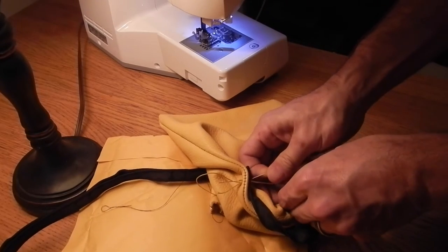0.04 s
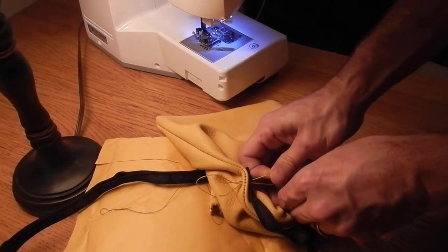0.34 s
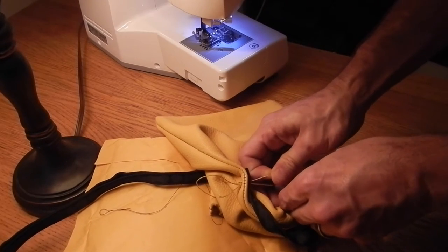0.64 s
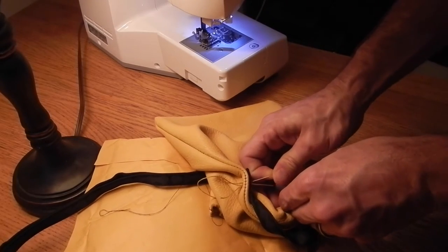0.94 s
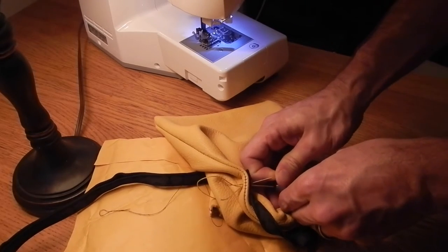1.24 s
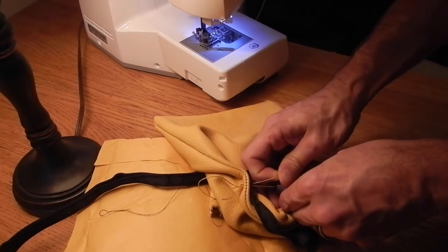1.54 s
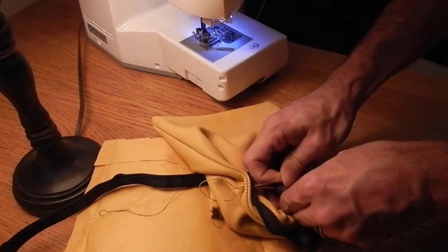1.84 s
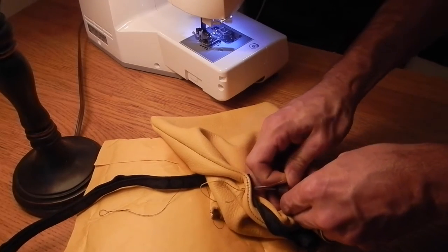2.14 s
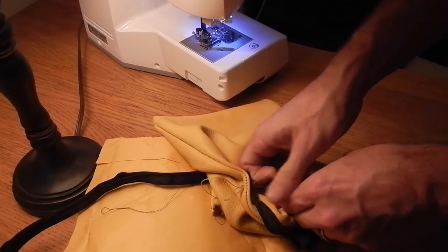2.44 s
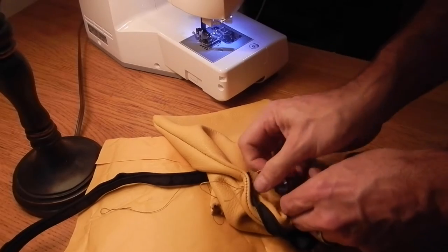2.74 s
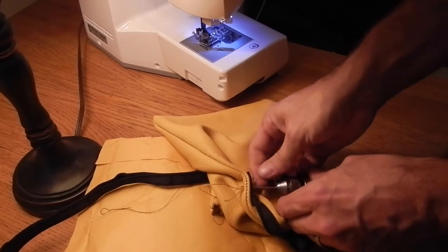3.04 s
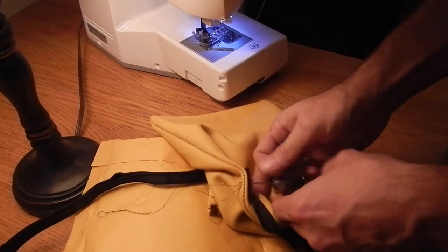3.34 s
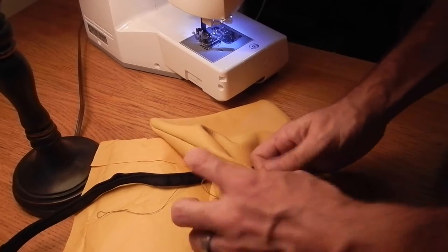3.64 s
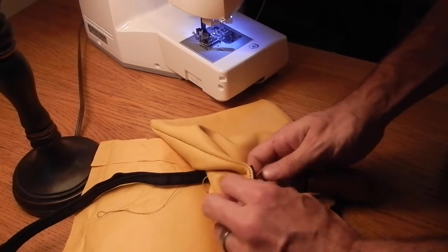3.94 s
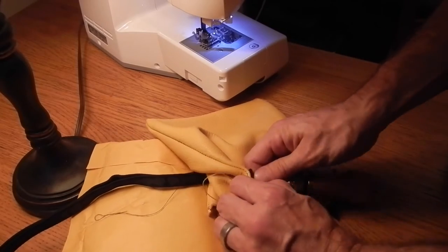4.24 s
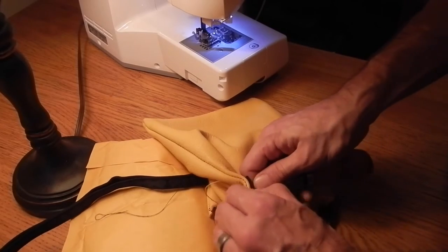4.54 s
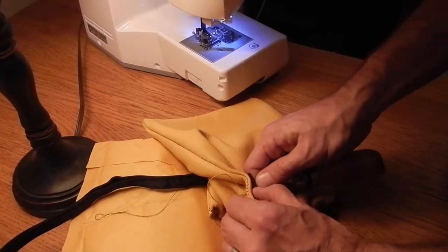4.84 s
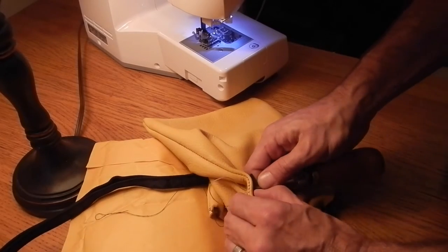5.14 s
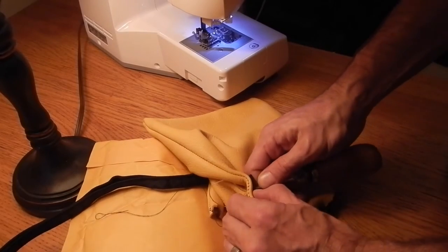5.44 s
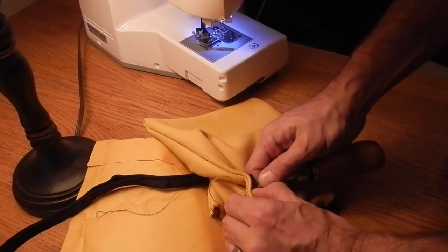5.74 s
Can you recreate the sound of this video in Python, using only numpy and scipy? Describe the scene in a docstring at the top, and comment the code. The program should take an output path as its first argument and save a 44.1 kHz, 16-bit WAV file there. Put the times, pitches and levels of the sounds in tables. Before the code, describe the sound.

Irregular sharp knocks of a tool on a wooden table, among faint needle clicks and the rubbing of leather being sewn by hand.

```python
"""The handle of an awl knocks on a wooden table as hands stitch soft leather in a small, quiet room.
Each blow rings the table top's modes under a hard click, then chatters in quick rebounds.
Needle and thread tick, hiss and squeak in the seam; the leather sticks and slips, rustling under the
fingers and once dragged with a short rasp. Thin steel rings faintly over a low room tone."""
import sys
import numpy as np
from scipy import signal
from scipy.fft import rfft, irfft, next_fast_len
from scipy.io import wavfile
from scipy.ndimage import map_coordinates

SR = 44100
rng = np.random.default_rng(int(sys.argv[2]) if len(sys.argv) > 2 else 0)


def materialize(psi):
    """Save the field psi as 16-bit PCM at rate SR to the path in sys.argv[1].

    A 1-D psi becomes a single channel; in a 2-D psi each row is a channel.
    """
    bounded = np.clip(np.atleast_2d(psi).T, -1, 1)
    quanta = np.round(bounded * 32767).astype(np.int16)
    wavfile.write(sys.argv[1], SR, quanta)


N = 256220

# how busily the fingers work the leather: t/s, effort/dB
FINGER_EFFORT = [(0.0, -71), (1.23, -65), (1.42, -71), (1.67, -69), (1.88, -59.5), (2.12, -68.5),
                 (2.31, -62), (2.48, -62), (2.88, -60), (3.54, -69.5), (3.82, -79), (4.29, -61.5),
                 (4.4, -58), (4.77, -68), (4.95, -55.5), (5.06, -58.5), (5.57, -61), (5.81, -63)]
# dull colour of rubbed leather: f/Hz, level/dB
LEATHER_COLOUR = [(120, -78), (200, -29), (311, -4.5), (770, 0), (1030, -4), (1400, -10), (1890, -12.5),
                  (2650, -19.5), (3000, -21), (3900, -21), (6600, -120)]


def awl_knocks(attack_s=0.00024, crack_db=-7, main_hz=820):
    """Each blow rings the table top; a harder one brings out the side modes. The tool adds a click."""
    # modes of the table top: f/Hz, level/dB, t60/s
    top_modes = [(241, -28, 0.084), (371.5, -6, 0.037), (553, -3, 0.045), (828.4, 12.5, 0.02),
                 (1060, 11, 0.0062), (1359, 2, 0.036), (1684, -13, 0.06), (2170, -21.5, 0.14)]
    # its many weak modes, heard as one short crack: f/Hz, level/dB
    crack_colour = [(25, -54), (60, -71), (130, -45.5), (230, -4.5), (350, -1), (560, 0.5), (780, -1),
                    (1050, 7), (1420, -9.5), (1600, -13.5), (2050, -19.5), (2600, -19.5), (4000, -26),
                    (7000, -91)]
    # colour of a hard contact: f/Hz, level/dB
    click_colour = [(100, -68), (600, -29), (1900, 14), (2600, -1), (4100, -4), (5000, -1), (6300, -3.5),
                    (7500, -7.5), (10000, -16), (14000, -23)]
    out, t = np.zeros(N), np.arange(SR // 2) / SR
    hz, level, t60 = np.transpose(top_modes)[:, :, None]
    for s, db, hardness, pitch, click_db, click_hz in handle_contacts():
        strength = amp(level + hardness * np.abs(np.log2(hz / main_hz)) + rng.normal(0, 0.24, hz.shape))
        detune = np.exp(rng.normal(0, .025, hz.shape))  # the hands' load shifts each mode
        modes = strength * amp(-60 * t / t60) * np.sin(2 * np.pi * hz * pitch * detune * t)
        wood = crest(low_cut(modes.sum(0) * (1 - np.exp(-t / attack_s)), corner_hz=238))
        crack = crest(low_cut(coloured(burst(t, t60=0.087), crack_colour), corner_hz=113))
        knock = with_echoes(wood + amp(crack_db) * crack, strength=0.55, dull_hz=3400)
        boom_envelope = amp(-35 - 60 * t / 0.26) * (1 - np.exp(-t / 0.0017))
        boom = boom_envelope * np.sin(2 * np.pi * 124 * t)  # the room's lowest resonance
        click = filtered(burst(t, t60=0.027), lambda f: 0.32 + resonance(f, click_hz, click_hz / 7))
        add(out, s, amp(db) * (in_room(knock, wet_db=-9) + boom))
        add(out, s, amp(click_db) * in_room(crest(coloured(click, click_colour)), wet_db=-12))
    return out


def handle_contacts(rebounds=2, flight_s=.017, flight_shrink=0.69, bounce_loss_db=5.5):
    """The handle strikes, then chatters in ever quicker and softer rebounds."""
    # blows on the wood: t/s, level/dB, hardness/(dB per octave from the main mode), pitch/ratio,
    # click level/dB, click f/Hz, drop to the first rebound/dB
    blows = [(1.7835, -31.5, -25, 0.9, -54, 5000, 30), (1.7995, -35, 7, 0.54, -48, 4400, 30),
             (1.865, -8, 1, 1.065, -13.5, 5100, 27), (1.8665, -15.5, 5, 0.605, -20, 5070, 38),
             (2.3025, -10.5, -5.5, 0.99, -23, 5800, 24), (2.599, -11, -9, 0.98, -37, 5850, 23),
             (4.294, -30, -5, .56, -36.5, 4530, 10), (4.359, -15, -7, 1.25, -27, 4340, 25),
             (4.6715, -11, -2.5, 0.98, -17, 5800, 30), (4.967, -5, -6, 1.03, -14.5, 4650, 33),
             (5.1412, -5, -6, 1.05, -16, 3030, 17), (5.178, -12, -4, 1.05, -29, 3100, 4.5),
             (5.573, -35, 7, 0.59, -62, 5000, 1)]
    for s, db, hardness, pitch, click_db, click_hz, drop_db in blows:
        yield s, db, hardness, pitch, click_db, click_hz
        for k in range(rebounds):
            s += flight_s * flight_shrink ** k
            loss_db = drop_db + bounce_loss_db * k
            yield s, db - loss_db, hardness, pitch, click_db - loss_db, click_hz


def needle_ticks(cycles=6, pop_noise_db=-5, pop_trim_db=-3):
    """Needle and thread catch and let go: a dry snap, and a pop of a few cycles in the taut leather."""
    # clear catches: t/s, pop level before trim/dB, pop f/Hz, snap level/dB, snap f/Hz
    catches = [(.928, -32.5, 816, -53, 3500), (1.6423, -31.5, 2050, -36, 4900),
               (2.3412, -19.5, 1040, -36, 5030), (2.524, -65, 900, -42, 5400),
               (2.5811, -58, 900, -36, 5230), (2.725, -34.5, 1150, -43, 3480),
               (2.7885, -30.5, 840, -41.5, 4600), (2.8673, -56, 900, -40, 5060),
               (2.885, -35, 1060, -49, 4000), (3.025, -34, 1010, -37.5, 3920),
               (3.0365, -29.5, 734, -40, 4170), (3.11, -47, 850, -42.5, 3980),
               (3.259, -43.5, 750, -47, 5100), (3.4027, -39, 846, -57, 4000), (3.6218, -56, 900, -51, 5030),
               (3.682, -43, 746, -66, 4000), (3.8255, -38.5, 690, -62, 5000),
               (4.0175, -22.5, 1010, -37.5, 3670), (4.148, -38, 950, -52, 4480),
               (4.180, -33, 1680, -49, 4220), (4.1946, -33.5, 1090, -56, 3500),
               (4.325, -20.5, 960, -39, 4400), (4.3564, -23.5, 560, -32, 4200),
               (4.468, -34.5, 1140, -34, 4470), (4.7087, -28, 900, -34, 4900), (4.879, -75, 940, -40, 6060),
               (5.35, -33, 1000, -47, 4000)]
    out, t = np.zeros(N), np.arange(SR // 4) / SR
    for s, db, pop_hz, snap_db, snap_hz in catches + faint_catches():
        tone = amp(-60 * t * pop_hz / cycles) * np.sin(2 * np.pi * pop_hz * t) * (1 - np.exp(-t * pop_hz))
        scuff = crest(coloured(burst(t, t60=0.062), LEATHER_COLOUR))
        pop = crest(low_cut(tone, corner_hz=330)) + amp(pop_noise_db) * scuff
        snap = filtered(burst(t, t60=0.02),
                        lambda hz: resonance(hz, snap_hz, 0.31 * snap_hz) / (1 + 1j * hz / 9500) ** 2)
        add(out, s, in_room(amp(db + pop_trim_db) * pop + amp(snap_db) * crest(snap), wet_db=-8.5))
    return out


def faint_catches(per_s=12, pop_hz=870, snap_hz=4900, spread_db=0.5):
    """The thread also snags lightly at random moments, louder while the fingers are busy."""
    s = rng.random(round(per_s * N / SR)) * N / SR
    pop_softness, pop_pitch, snap_softness, snap_pitch = rng.standard_normal((len(s), 4)).T
    effort_db = curve(FINGER_EFFORT, s)
    pop_db = effort_db + 15.5 - spread_db * pop_softness
    snap_db = effort_db + 12.5 - spread_db * snap_softness
    return list(zip(s, pop_db, pop_hz * np.exp(.15 * pop_pitch),
                    snap_db, snap_hz * np.exp(.17 * snap_pitch)))


def leather_slides(swell_share=0.25):
    """Sliding leather sticks and slips: a dull body and a dry rasp swell and fade together."""
    # strokes: t/s, length/s, body level/dB, rasp level/dB
    strokes = [(.68, .16, -52, -85), (0.795, 0.092, -52, -62.5), (1.21, 0.37, -67, -66),
               (1.69, 0.033, -59, -52.5), (2.682, 0.14, -47.5, -55), (2.835, 0.18, -61, -61),
               (2.981, .19, -47.5, -54.5), (3.988, 0.056, -41, -58), (4.289, 0.14, -37, -39),
               (4.369, 0.14, -58, -41), (5.518, 0.08, -63, -55), (5.546, .14, -52, -80)]
    # colour of the rasp: f/Hz, level/dB
    rasp_colour = [(100, -60), (1000, -4), (1800, 0.5), (2700, -10.5), (3600, -4.5), (5800, -7.5),
                   (6700, -6), (9500, -15.5), (12000, -19), (15000, -32)]
    t = np.arange(N) / SR
    body, rasp = np.zeros(N), np.zeros(N)
    for start, length, body_db, rasp_db in strokes:
        swell = np.interp((t - start) / length, [0, swell_share, 1], [0, 1, 0]) ** 1.45
        body += amp(body_db) * swell
        rasp += amp(rasp_db) * swell
    body *= coloured(grains(per_s=1200, spread_db=2.5), LEATHER_COLOUR)
    rasp *= coloured(grains(per_s=2000, spread_db=-3), rasp_colour)
    return in_room(body + rasp, wet_db=-12)


def leather_rustle(typical_effort_db=-63.5):
    """The fingers never rest: soft rubbing under sparse crinkles of the hide, both growing with effort."""
    # colour of the dry crinkle: f/Hz, level/dB
    crinkle_colour = [(100, -68), (1000, -7), (1900, 1), (2600, -4), (3600, -1), (5000, -4), (6600, 0.5),
                      (8000, -10.5), (10500, -16), (15000, -31)]
    effort_db = curve(FINGER_EFFORT, np.arange(N) / SR) - typical_effort_db
    creases = grains(per_s=500, spread_db=5)
    rub = amp(-61.5 + 0.2 * effort_db) * coloured(grains(per_s=800, spread_db=6), LEATHER_COLOUR)
    crinkle = amp(-69.5 + 1.4 * effort_db) * coloured(creases, crinkle_colour)
    return in_room(rub + crinkle, wet_db=0)


def thread_hiss():
    """Thread running through its hole gives a fine hiss that swells and fades with its speed."""
    # pulls of the thread: t/s, length/s, level/dB
    pulls = [(.25, .2, -73), (0.803, 0.47, -72), (5.618, .26, -61.5)]
    # colour of the hiss: f/Hz, level/dB
    hiss_colour = [(3000, -60), (7000, -9), (9270, -11), (10300, -2), (11700, -5), (13800, -12),
                   (15000, -22)]
    t = np.arange(N) / SR
    speed = sum(amp(db) * np.sin(np.pi * np.clip((t - s) / length, 0, 1)) for s, length, db in pulls)
    return speed * coloured(rng.standard_normal(N), hiss_colour)


def thread_squeaks(fade_s=.03, jitter_hz=110, flicker_db=2.5):
    """Tight thread sings a thin, unsteady tone that glides with the pull through one broad resonance."""
    # one pitch glide per squeak: t/s, f/Hz
    glides = [
        [(2.18, 8850), (2.23, 10100), (2.33, 11090), (2.498, 10300), (2.542, 9832), (2.58, 9050)],
        [(5.04, 11335), (5.078, 13300), (5.11, 14375), (5.24, 14157), (5.338, 11430), (5.41, 11635),
         (5.45, 10238)],
    ]
    # modes, each flickering on its own: pitch/ratio, level/dB
    squeak_modes = [(.9, -11), (1, 2.5), (1.42, -4)]
    out, t = np.zeros(N), np.arange(N) / SR
    for glide in glides:
        start, end = glide[0][0], glide[-1][0]
        gate = np.clip(np.minimum(t - start, end - t) / fade_s + .5, 0, 1)
        hz = curve(glide, t) + jitter_hz * wobble(per_s=500)
        phase = 2 * np.pi * np.cumsum(hz) / SR
        for ratio, db in squeak_modes:
            out += gate * amp(db + flicker_db * wobble(per_s=25)) * np.sin(ratio * phase)
    return amp(-66.5) * filtered(out, lambda f: resonance(f, centre=11400, width=1500))


def steel_ring(ring_hz=8310, beat_hz=13, rise_s=0.01, t60=.36):
    """A thin steel tool sings faintly when jogged; its two bending planes beat against each other."""
    # jogs of the steel: t/s, level/dB
    jogs = [(1.89, -56.5), (2.79, -67), (2.865, -67), (4.421, -53), (4.499, -52.5), (4.671, -59),
            (5.192, -55)]
    out, t = np.zeros(N), np.arange(SR // 2) / SR
    for s, db in jogs:
        ring = np.sin(2 * np.pi * ring_hz * t)
        ring += 0.62 * np.sin(2 * np.pi * ((ring_hz + beat_hz) * t + rng.random()))
        add(out, s, amp(db - 60 * t / t60) * (1 - np.exp(-t / rise_s)) * ring)
    return out


def with_echoes(x, strength, dull_hz):
    """Floor and walls return the sound of the table's underside, dulled and mostly inverted."""
    # first reflections: delay/s, gain/ratio
    echoes = [(.00609, -.7), (.00728, .39), (.00997, -.51), (.01293, -.53), (.01573, -.23), (.02084, -.26)]
    bounce = lambda hz: sum(gain * np.exp(-2j * np.pi * hz * delay) for delay, gain in echoes)
    return filtered(x, lambda hz: 1 + strength * bounce(hz) / (1 + (hz / dull_hz) ** 2))


def in_room(x, wet_db, build_s=0.0056, late_db=-15.5, late_t60=0.93):
    """The room adds a diffuse tail that builds up as reflections multiply, then lingers faintly."""
    # the room's main decay: f/Hz, t60/s
    decay_times = [(120, 0.16), (300, 0.28), (900, 0.17), (2000, 0.28), (5000, 0.21), (13000, 0.31)]
    hz, t, noise = signal.stft(rng.standard_normal(SR // 2), SR, nperseg=256)
    early = amp(-60 * t / along(decay_times, hz)[:, None])
    late = amp(late_db - 60 * t / late_t60) / (1 + (hz[:, None] / 7000) ** 2)
    tail = signal.istft(noise * (early + late), SR, nperseg=256)[1]
    tail *= 1 - np.exp(-(np.arange(len(tail)) / SR / build_s) ** 2)
    return x + amp(wet_db) * signal.fftconvolve(x, tail / np.linalg.norm(tail))[:len(x)]


def room_tone():
    """A steady bed of air noise, with a low drone in the room's resonances."""
    # colour of the air: f/Hz, level/dB
    air_colour = [(25, -42), (50, -29), (90, -22), (125, -9.5), (219, -0.5), (264, -3.5), (300, -1.5),
                  (400, -5), (655, -9), (1100, -11), (1960, -25.5), (4750, -30), (6500, -30.5),
                  (8500, -38.5), (15000, -41.5)]
    # droning room resonances: f/Hz, width/Hz, level/dB
    room_modes = [(132.1, 12.3, -69), (240, 29, -61.5), (291.3, 21, -66)]
    bed = amp(-55.5) * coloured(rng.standard_normal(N), air_colour)
    for centre, width, db in room_modes:
        drone = filtered(rng.standard_normal(N), lambda hz: resonance(hz, centre, width) ** 2)
        bed += amp(db) * unit(drone)
    return bed


def grains(per_s, spread_db):
    """Tiny slips of random size at random moments."""
    slips = (rng.random(N) < per_s / SR) * rng.choice([-1, 1], N)
    return slips * amp(spread_db * np.minimum(rng.standard_normal(N), 2))


def burst(t, t60):
    """Noise that starts at once and dies away."""
    return rng.standard_normal(len(t)) * amp(-60 * t / t60)


def wobble(per_s):
    """A smooth random curve with per_s knots a second."""
    return map_coordinates(rng.standard_normal(int(N * per_s / SR) + 4), [np.arange(N) * per_s / SR])


def resonance(hz, centre, width):
    """Causal response of one resonance."""
    return 1j * hz * width / (centre ** 2 - hz ** 2 + 1j * hz * width)


def low_cut(x, corner_hz):
    """Small sources radiate little bass."""
    return signal.sosfilt(signal.butter(2, corner_hz, "high", fs=SR, output="sos"), x)


def filtered(x, response):
    """x shaped by a frequency response."""
    size = next_fast_len(len(x) + SR // 4)
    return irfft(rfft(x, size) * response(np.fft.rfftfreq(size, 1 / SR)), size)[:len(x)]


def coloured(x, colour):
    """x through an EQ curve (f/Hz, level/dB), at rms 1."""
    return unit(filtered(x, lambda hz: amp(along(colour, hz))))


def along(points, hz):
    """Points (f/Hz, value) read on a log frequency axis."""
    f, values = np.transpose(points)
    return np.interp(np.log(hz + 1), np.log(f + 1), values)


def curve(points, t):
    """Points (t/s, value) read at the times t."""
    return np.interp(t, *np.transpose(points))


def amp(db):
    """Decibels to gain."""
    return 10 ** (np.asarray(db) / 20)


def unit(x):
    """Scaled to rms 1."""
    return x / np.sqrt(np.mean(x ** 2) + 1e-20)


def crest(x):
    """Scaled to peak 1."""
    return x / np.abs(x).max()


def add(track, s, sound):
    """Mix a sound into the track at time s."""
    part = track[max(round(s * SR), 0):][:len(sound)]
    part += sound[:len(part)]


def scene():
    """The work at the table over the room tone, in mono."""
    work = awl_knocks() + needle_ticks() + leather_slides() + leather_rustle()
    return (work + thread_hiss() + thread_squeaks() + steel_ring() + room_tone())[None]


def record(dry, ceiling=0.63, top_hz=15500):
    """A soft clip rounds off the tallest peaks; a steep cut removes the highest treble."""
    rounded = dry / (1 + (dry / ceiling) ** 6) ** (1 / 6)
    return np.array([filtered(channel, lambda hz: hz < top_hz) for channel in rounded])


dry = scene()
out = record(dry)
materialize(out)
```